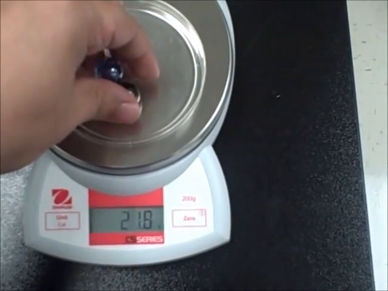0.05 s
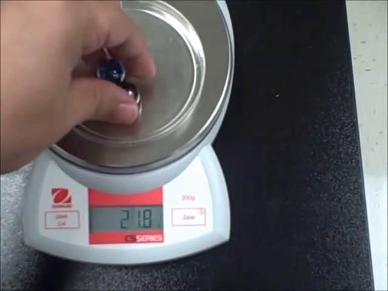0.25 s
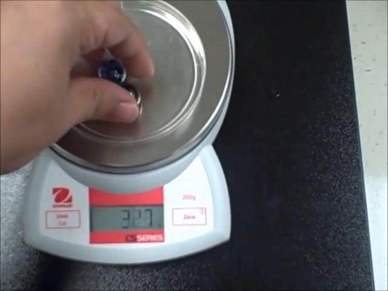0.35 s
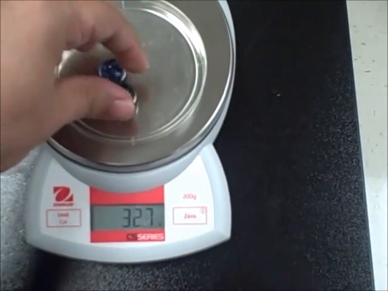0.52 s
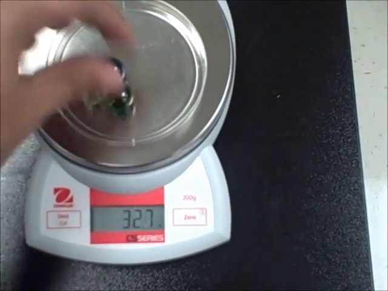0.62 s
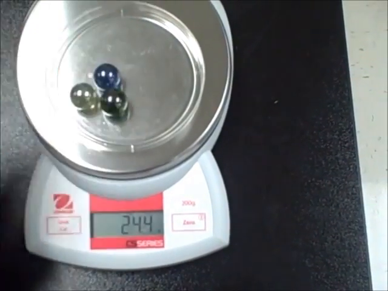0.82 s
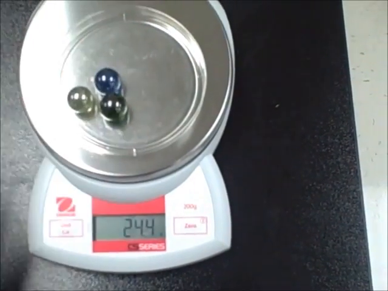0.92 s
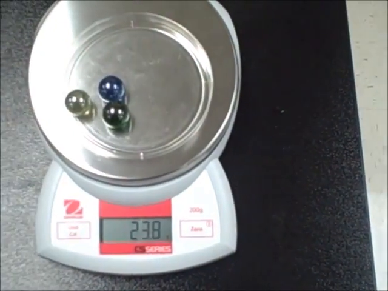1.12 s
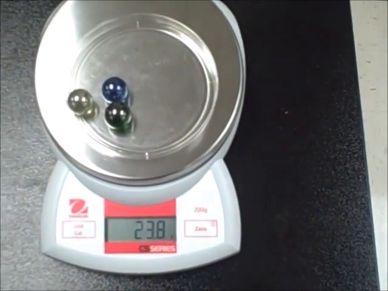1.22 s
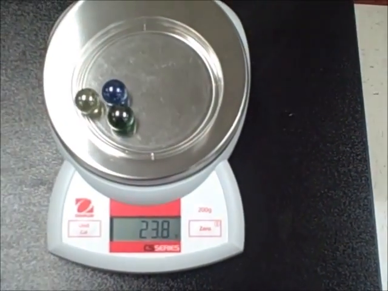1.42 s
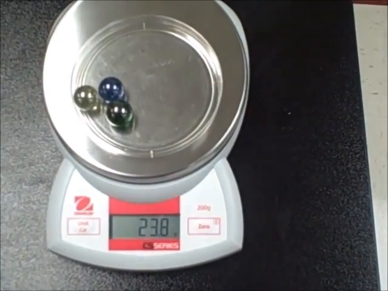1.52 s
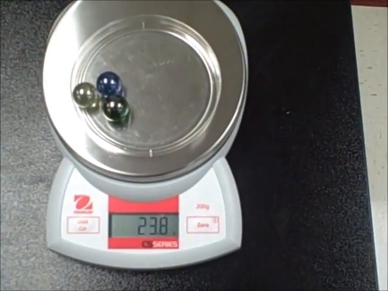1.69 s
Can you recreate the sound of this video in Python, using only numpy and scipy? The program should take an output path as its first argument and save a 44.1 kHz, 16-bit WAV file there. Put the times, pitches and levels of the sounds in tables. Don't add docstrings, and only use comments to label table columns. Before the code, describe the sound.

Glass marbles released onto a scale pan: a faint tick, one loud clink with a tight flurry of bounces, sparse tiny ticks as they settle, short bright room echo, close microphone, low ventilation noise.

```python
import sys
import numpy as np
from scipy import signal
from scipy.io import wavfile

SR = 44100
rng = np.random.default_rng(int(sys.argv[2]) if len(sys.argv) > 2 else 0)


def volts_from_decibels(level):
    exponent = np.asarray(level, float) / 20
    return 10 ** exponent


def dump_mix(stems):
    frames = np.atleast_2d(stems).T
    limited = np.clip(frames, -1, 1)
    pcm = np.round(limited * 32767).astype(np.int16)
    wavfile.write(sys.argv[1], SR, pcm)


N = 77175
HISS_TOP_HZ = 15850

# (frequency [Hz], level [dB], decay by 60 dB [s])
GLASS_MODES = [(4100, -12, .006), (4950, 0, .007), (5750, -11, .005), (6450, -2, .008), (7150, -4, .006),
               (8400, -13, .004), (9700, -6, .005), (10600, -7, .005), (12200, -8, .004), (13700, -8, .004),
               (15100, -7, .004)]
# (frequency [Hz], level [dB], decay by 60 dB [s])
BODY_MODES = [(387, -39, .125), (500, -42.5, .1), (660, -46, .12), (800, -46, .07), (1365, -36, .045),
              (1440, -31, .03), (1575, -40, .06), (1715, -40, .05), (1972, -38.5, .05), (2215, -33.5, .042),
              (2355, -30.5, .04), (2585, -45, .045), (3065, -38, .045), (3250, -35, .045)]
CONTACT_TIMES = [.1967, .2002, .2129, .2239, .2305, .2356, .0258, .1788, .6519, .7380, .8016, 1.2066,
                 1.3400, 1.5443, 1.5619, 1.5728, 1.6075, 1.6010]
# (click peak [dB], knock on the dish [dB], loss of the top when soft [dB])
CONTACT_STRENGTH = [(-44, -50, 9), (-32, -40, 9), (-15, 0, 0), (-31, -11, 4), (-44, -20, -2),
                    (-50, -28, -3), (-43, -35, 6), (-61, -55, 4), (-50, -42, 3), (-60, -50, 6),
                    (-65, -55, 3), (-56, -48, 8), (-63, -50, 3), (-43, -48, 5), (-51, -48, 9),
                    (-66, -55, 3), (-57, -55, 6), (-62, -55, 6)]
# (pitch of the glass [ratio], favoured frequency [Hz])
CONTACT_PLACE = [(1.12, 7300), (1.12, 9900), (1, 5500), (1, 6450), (1, 10000), (1, 13000), (1, 4900),
                 (1, 6000), (1, 9000), (1, 8000), (1, 8000), (1, 8500), (1, 4000), (.9, 10200), (.98, 5600),
                 (.98, 5600), (.885, 5700), (.885, 5000)]
# (frequency [Hz], decay by 60 dB [s])
ROOM_DECAY = [(300, .25), (1500, .3), (5000, .36), (14000, .22)]
# (frequency [Hz], level [dB])
ECHO_COLOUR = [(2500, -14), (4500, -2), (6500, 0), (8300, -7), (10000, -5), (15000, -10)]
# (time [s], frequency [Hz], level [dB], length [s])
FAR_SQUEAKS = [
    (1.30, 2215, -73, .018),
    (1.33, 1720, -79, .03),
    (1.13, 2350, -81, .02),
    (1.27, 4410, -87, .08),
    (1.13, 2900, -86, .08),
]
# (frequency [Hz], density [dB per Hz])
AIR_SPECTRUM = [(20, 4), (70, -3.5), (210, -8.5), (399, -15.5), (780, -17.5), (1760, -31.5), (5000, -37.5),
                (16000, -40.5)]
# (frequency [Hz], level [dB])
MAINS_HUM = [
    (59.3, -69),
    (118.6, -74),
]


def at_hz(points, hz):
    table_hz, value = np.transpose(points)
    return np.interp(np.log(hz), np.log(table_hz), value)


def rms_one(x):
    return x / np.sqrt(np.mean(x ** 2) + 1e-20)


def unit_energy(x):
    return x / np.linalg.norm(x)


def drift(rate):
    r = np.exp(-80 * np.pi * rate / SR)
    slow = signal.lfilter([1], [1, -2 * r, r * r], rng.standard_normal(N // 40 + 2002))[2000:]
    return np.interp(np.arange(N) / 40, np.arange(len(slow)), rms_one(slow - slow.mean()))


def band_pass(x, low_hz, high_hz):
    return signal.sosfilt(signal.butter(2, [low_hz, high_hz], "band", fs=SR, output="sos"), x)


def cut_top(x, order, hz):
    return signal.sosfilt(signal.ellip(order, .3, 60, hz, fs=SR, output="sos"), x)


def bands(x):
    edges = 14 * 2 ** np.arange(0, 10.6, .5)
    pairs = enumerate(zip(edges, edges[1:]))
    return [(np.sqrt(lo * hi), band_pass(x[k % 2], lo, hi)) for k, (lo, hi) in pairs]


def impulses(level_db):
    out = np.zeros(N)
    out[(np.array(CONTACT_TIMES) * SR).astype(int)] = volts_from_decibels(level_db)
    return out


def strike(times, level_db, dull_db, favour_hz, modes, rise_s):
    spread_db, favour_lift_db, favour_width = 2, 6, .12
    top_hz, even_per_db = 13000, .05
    out = np.zeros(N)
    luck = rng.standard_normal((len(times), len(modes)))
    luck *= (level_db < level_db.max())[:, None]
    for k, ((hz, mode_db, t60), own) in enumerate(zip(modes, luck.T)):
        favour = np.exp(-(np.log(hz / favour_hz) / favour_width) ** 2)
        lift_db = favour_lift_db * (dull_db != 0) * favour
        evening = even_per_db * (mode_db + 18) * (hz > GLASS_MODES[0][0])
        loss_db = dull_db * ((hz > top_hz) + evening)
        ring = np.full(N, 1e-18)
        hit = volts_from_decibels(level_db + mode_db + spread_db * own + lift_db - loss_db)
        ring[(times * SR).astype(int)] = hit * (-1) ** k
        w = 2 * np.pi * hz / SR
        r = volts_from_decibels(-60 / (t60 * SR))
        q = np.exp(-1 / (rise_s * SR))
        ring = signal.lfilter([0, np.sin(w)], [1, -2 * r * np.cos(w), r * r], ring)
        out += signal.lfilter([(1 - q * q) / 2, 0, (q * q - 1) / 2], [1, -2 * q * np.cos(w), q * q], ring)
    return out


def glass_clicks():
    click_db, _, dull_db = np.transpose(CONTACT_STRENGTH)
    ratio, favour_hz = np.transpose(CONTACT_PLACE)
    contacts = np.array([CONTACT_TIMES, click_db, dull_db, favour_hz])
    click = np.zeros(N)
    for pitch in np.unique(ratio):
        modes = np.array(GLASS_MODES) * [pitch, 1, 1]
        click += strike(*contacts[:, ratio == pitch], modes, rise_s=.00006)
    return click * volts_from_decibels(click_db.max()) / np.abs(click).max()


def body_knock():
    _, knock_db, dull_db = np.transpose(CONTACT_STRENGTH)
    favour_hz = np.transpose(CONTACT_PLACE)[1]
    return strike(np.array(CONTACT_TIMES), knock_db + 1.5, dull_db, favour_hz, BODY_MODES, rise_s=.0009)


def dish_push_and_thud():
    push_db, thud_db, thud_t60_s = -2, -27.5, .04
    blows = impulses(np.transpose(CONTACT_STRENGTH)[1])
    push = band_pass(blows, 110, 1800)
    t = np.arange(SR // 2) / SR
    thud = band_pass(rng.standard_normal(len(t)) * volts_from_decibels(-60 * t / thud_t60_s), 600, 3300)
    thud = signal.fftconvolve(blows, thud / np.abs(thud).max())[:N]
    return volts_from_decibels(push_db) * push + volts_from_decibels(thud_db) * thud


def room_answer(knock):
    room_db, room_gap_s, knock_to_room_db = -12, .008, -15
    early_db, early_gap_s, early_t60_s = 0.2, .0009, .021
    click_db, _, dull_db = np.transpose(CONTACT_STRENGTH)
    t = np.arange(SR // 2) / SR
    late, bright, early = np.zeros(len(t)), np.zeros(len(t)), np.zeros(len(t))
    for hz, band in bands(rng.standard_normal((2, len(t)))):
        tail = band * volts_from_decibels(-60 * t / at_hz(ROOM_DECAY, hz)) * np.clip(t / room_gap_s - 1, 0, 1)
        late += tail
        if hz > 2000:
            bright += tail * volts_from_decibels(at_hz(ECHO_COLOUR, hz))
    for hz, band in bands(rng.standard_normal((2, len(t)))):
        if hz > 2000:
            early += band * volts_from_decibels(at_hz(ECHO_COLOUR, hz))
    early *= volts_from_decibels(-60 * t / early_t60_s) * np.clip(t / early_gap_s - 1, 0, 1)
    click_echo = volts_from_decibels(room_db) * unit_energy(bright) + volts_from_decibels(early_db) * unit_energy(early)
    wet = signal.fftconvolve(impulses(click_db - .5 * dull_db), click_echo)
    wet += volts_from_decibels(room_db + knock_to_room_db) * signal.fftconvolve(knock, unit_energy(late))
    return cut_top(wet, 8, HISS_TOP_HZ)[:N]


def marbles():
    knock = body_knock()
    return glass_clicks() + knock + dish_push_and_thud() + room_answer(knock)


def far_off():
    peak_s, width_s, level_db = 1.26, 0.24, -75
    t = np.arange(N) / SR
    noise = rms_one(band_pass(rng.standard_normal(N), 965, 4200))
    swell = np.exp(-.5 * ((t - peak_s) / width_s) ** 2)
    out = volts_from_decibels(level_db + 1.8 * drift(19)) * noise * swell
    for s, hz, db, length in FAR_SQUEAKS:
        envelope = np.exp(-.5 * (2 * (t - s) / length) ** 2)
        out += np.sqrt(2) * volts_from_decibels(db) * envelope * np.sin(2 * np.pi * hz * t)
    return out


def air():
    floor_db, patchy_db, waver_db = -57, 1.48, 2.65
    lead_in = SR // 2
    noise = np.zeros(N)
    for hz, band in bands(rng.standard_normal((2, N + lead_in))):
        noise += band[lead_in:] * volts_from_decibels(at_hz(AIR_SPECTRUM, hz) + patchy_db * drift(12.5))
    t = np.arange(N) / SR
    hum = np.zeros(N)
    for hz, db in MAINS_HUM:
        hum += np.sqrt(2) * volts_from_decibels(db + waver_db * drift(4.9)) * np.sin(2 * np.pi * hz * t)
    return volts_from_decibels(floor_db) * rms_one(noise) + hum


def scene():
    background = cut_top(far_off() + air(), 12, HISS_TOP_HZ)
    return (marbles() + background)[None]


def roll_off(x):
    return signal.sosfilt(signal.butter(12, 16670, fs=SR, output="sos"), x)


def record(dry):
    mix = cut_top(dry, 10, 16400)
    return roll_off(mix)


dry = scene()
out = record(dry)
dump_mix(out)
```